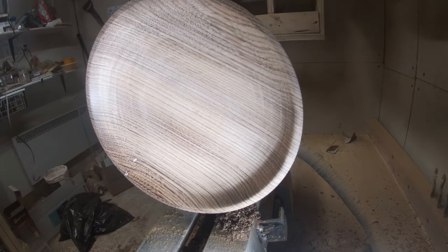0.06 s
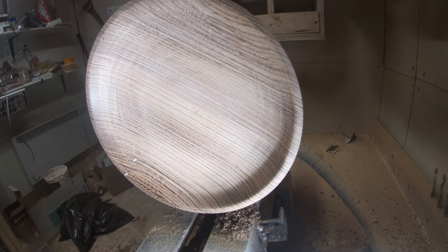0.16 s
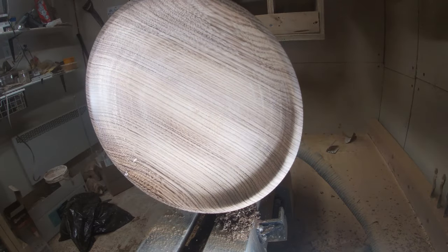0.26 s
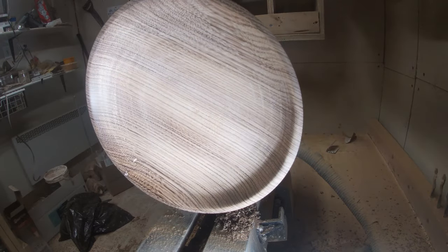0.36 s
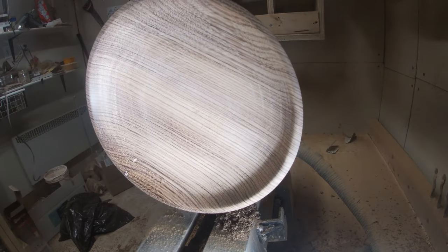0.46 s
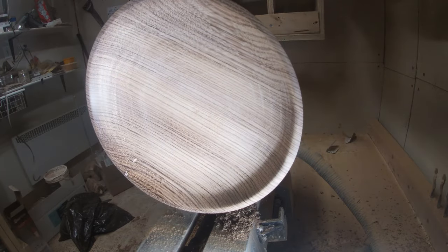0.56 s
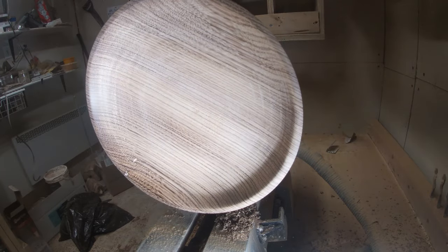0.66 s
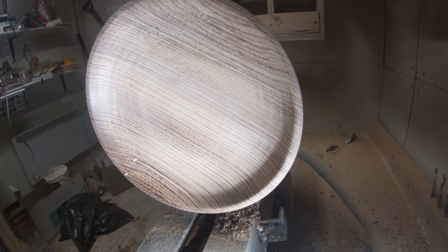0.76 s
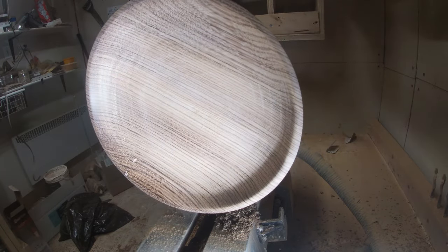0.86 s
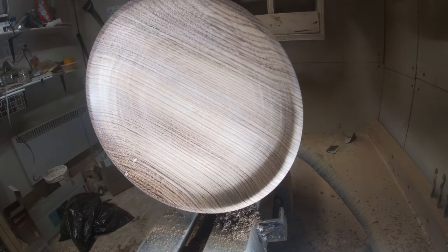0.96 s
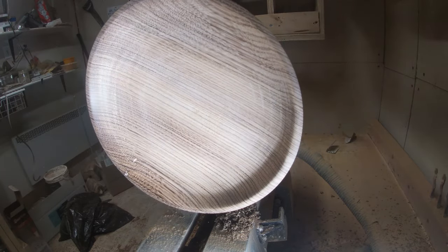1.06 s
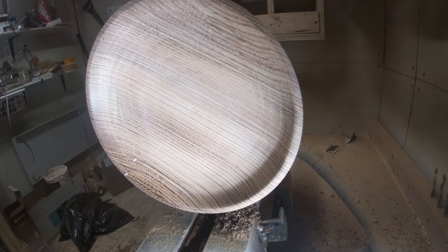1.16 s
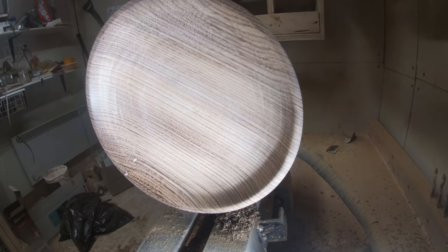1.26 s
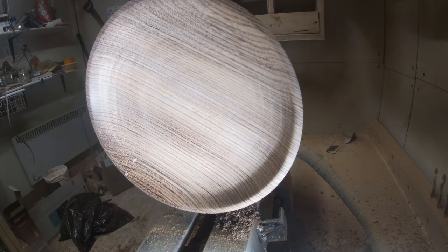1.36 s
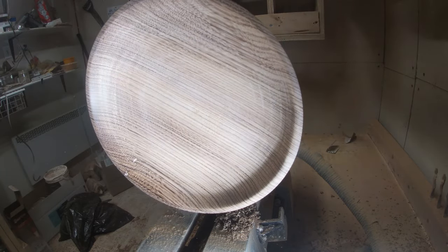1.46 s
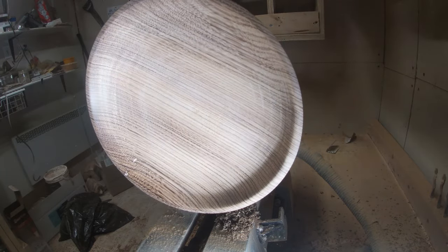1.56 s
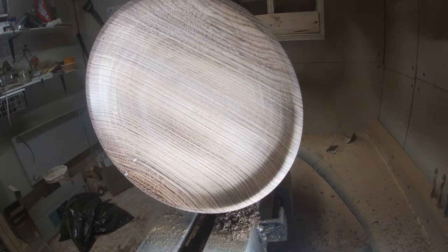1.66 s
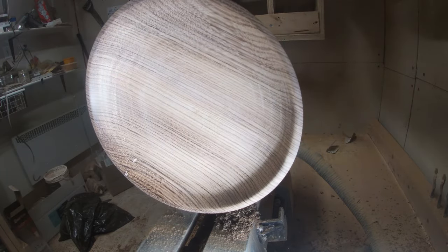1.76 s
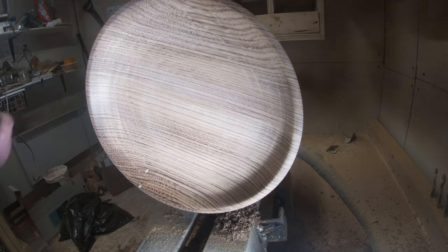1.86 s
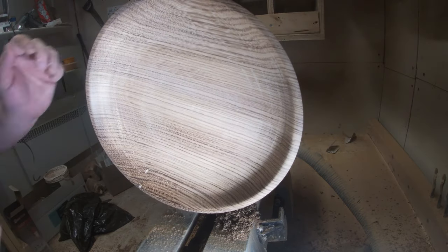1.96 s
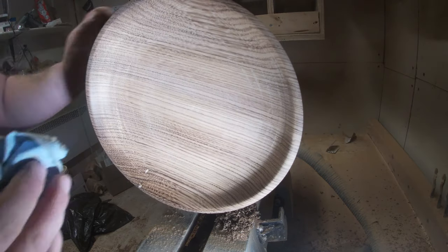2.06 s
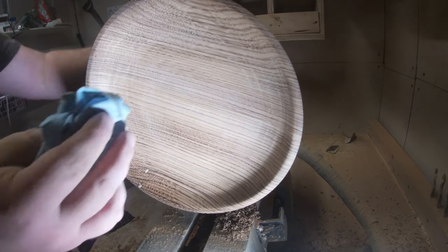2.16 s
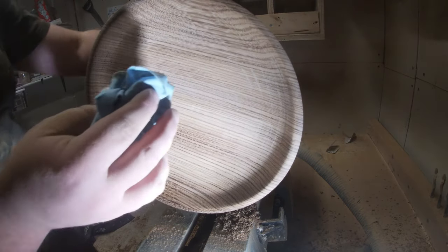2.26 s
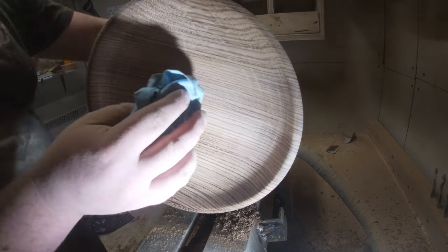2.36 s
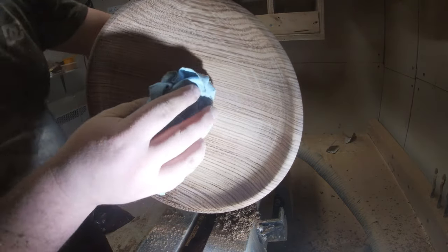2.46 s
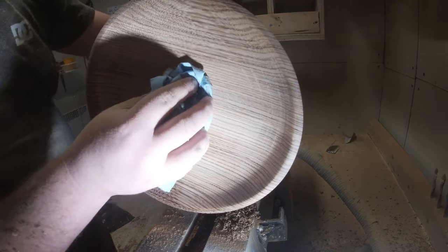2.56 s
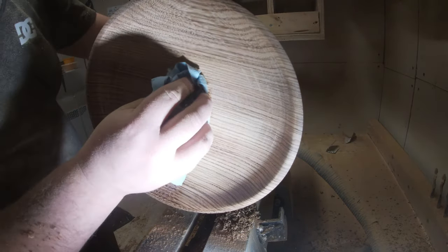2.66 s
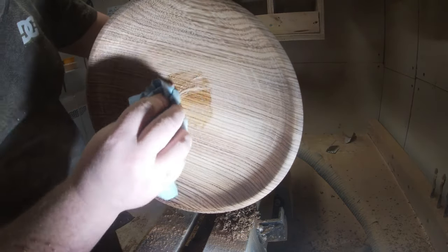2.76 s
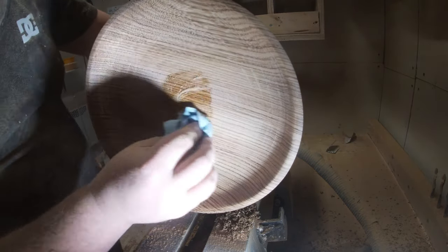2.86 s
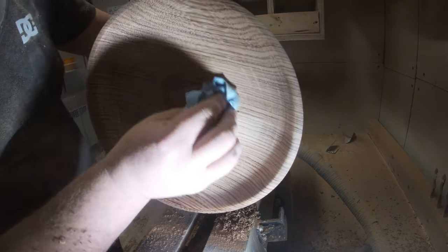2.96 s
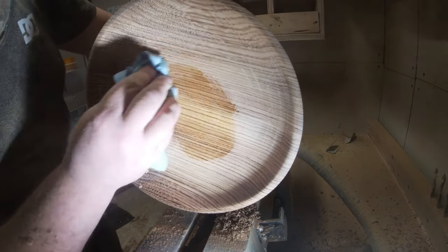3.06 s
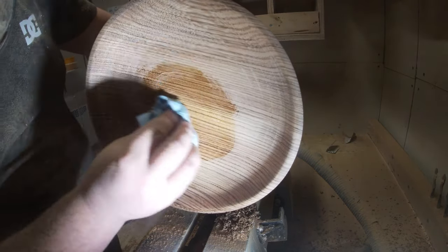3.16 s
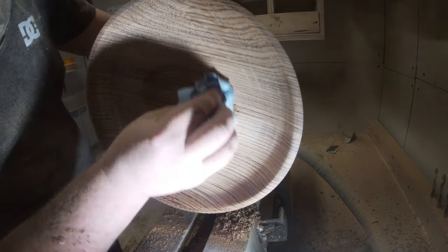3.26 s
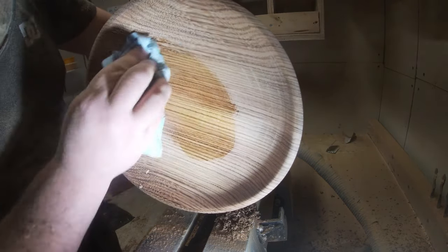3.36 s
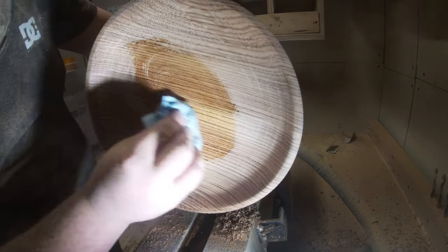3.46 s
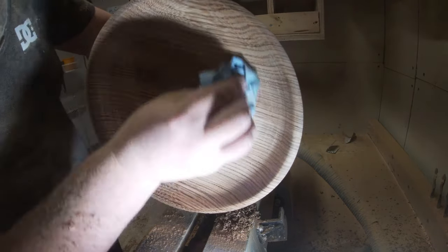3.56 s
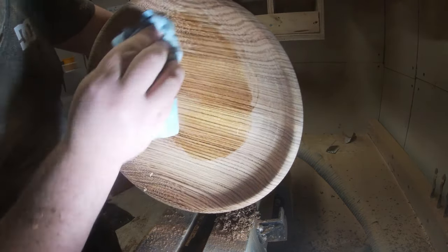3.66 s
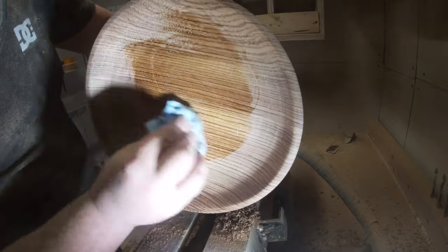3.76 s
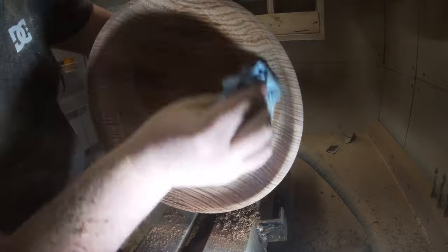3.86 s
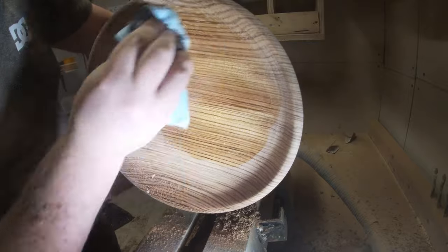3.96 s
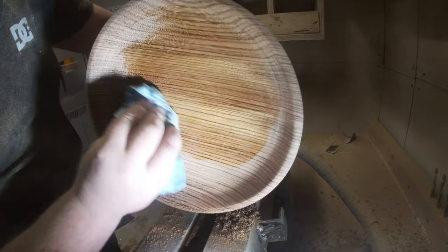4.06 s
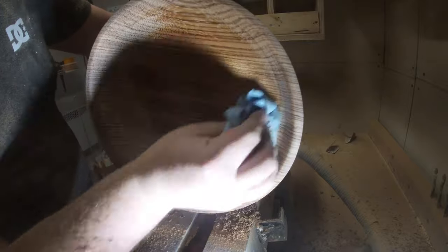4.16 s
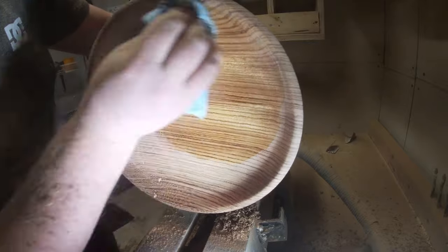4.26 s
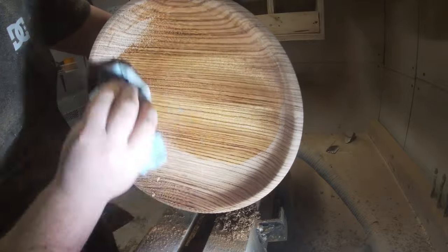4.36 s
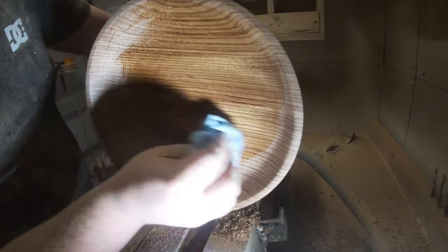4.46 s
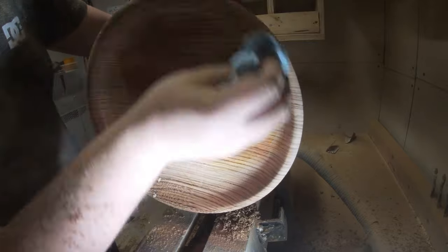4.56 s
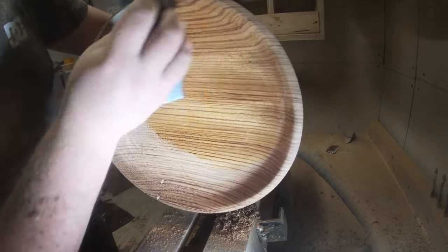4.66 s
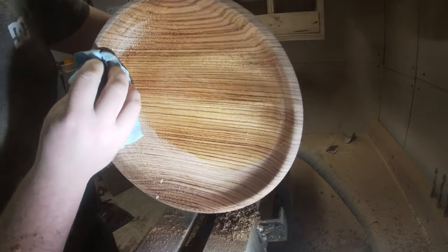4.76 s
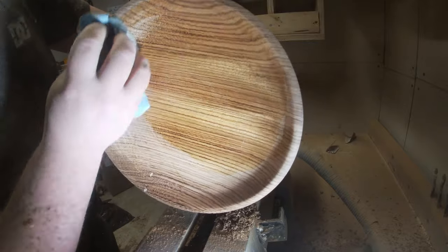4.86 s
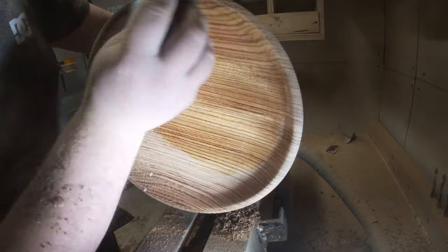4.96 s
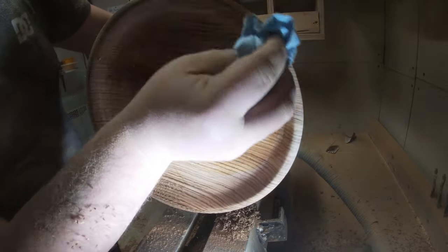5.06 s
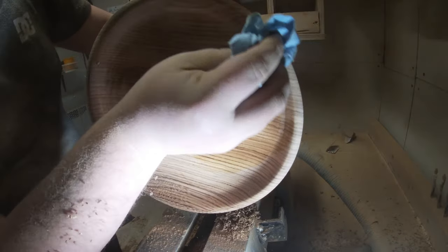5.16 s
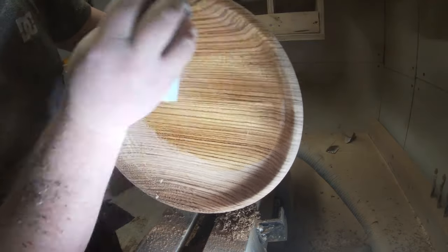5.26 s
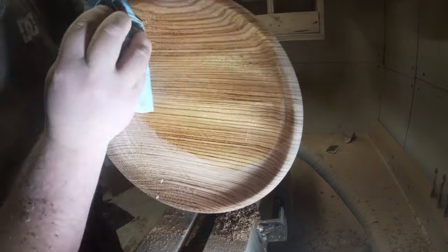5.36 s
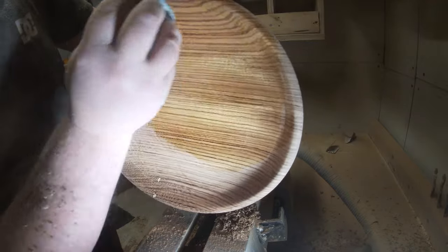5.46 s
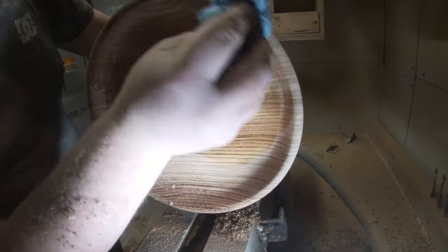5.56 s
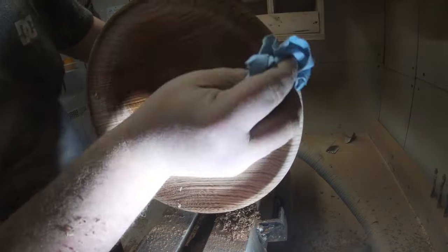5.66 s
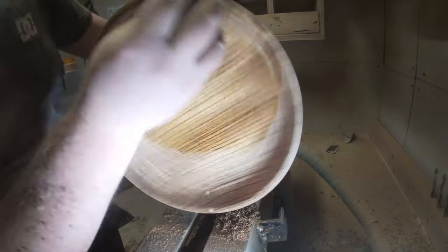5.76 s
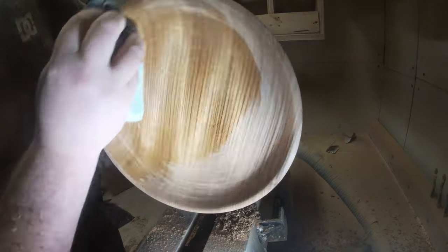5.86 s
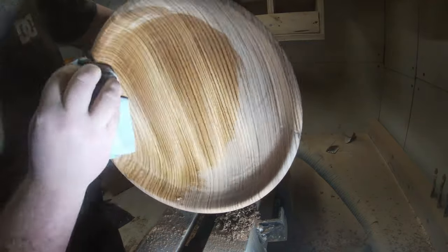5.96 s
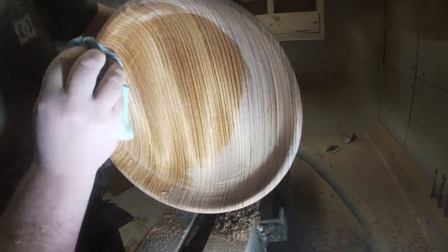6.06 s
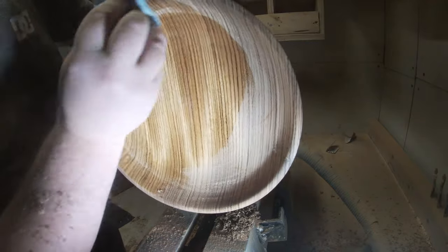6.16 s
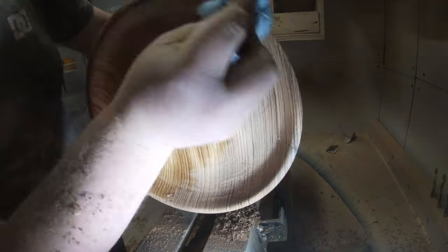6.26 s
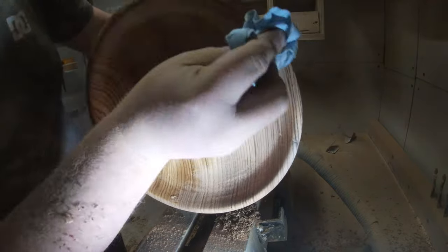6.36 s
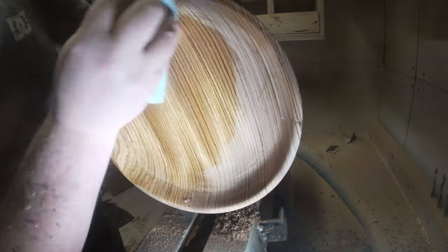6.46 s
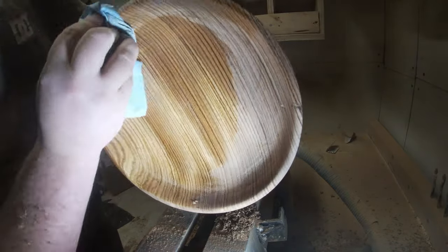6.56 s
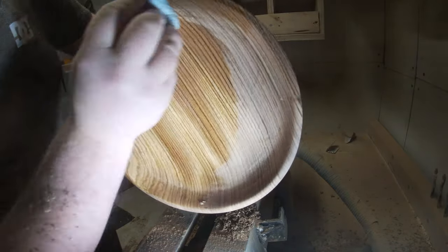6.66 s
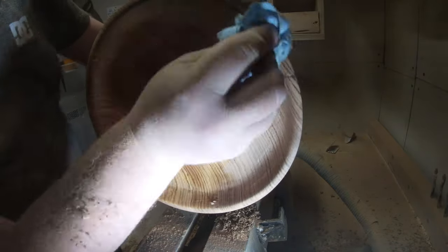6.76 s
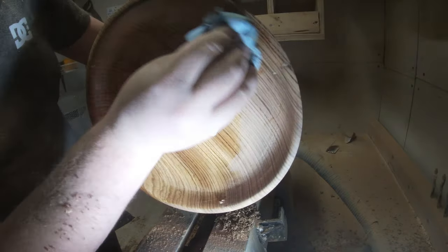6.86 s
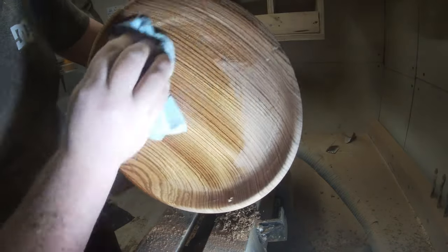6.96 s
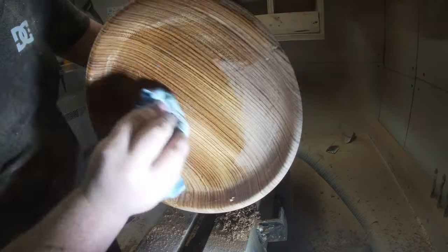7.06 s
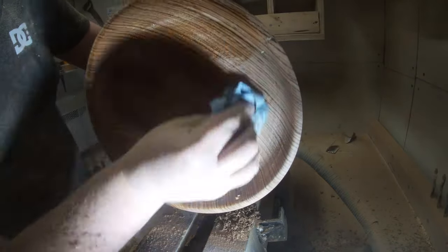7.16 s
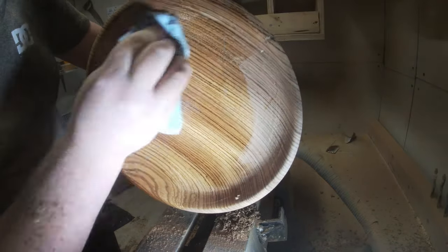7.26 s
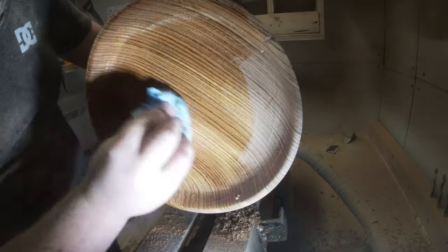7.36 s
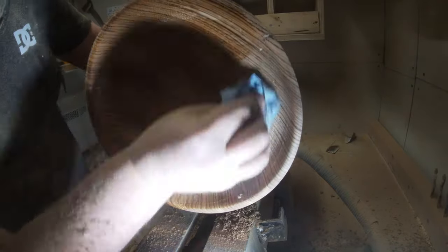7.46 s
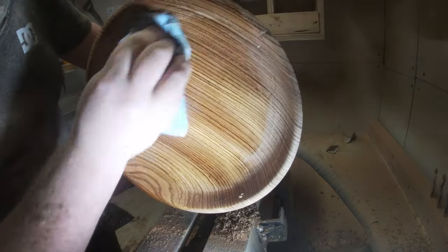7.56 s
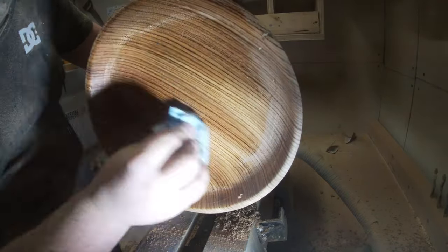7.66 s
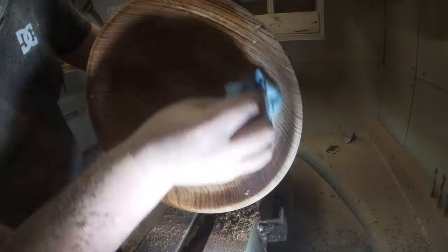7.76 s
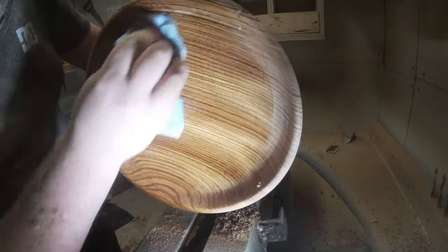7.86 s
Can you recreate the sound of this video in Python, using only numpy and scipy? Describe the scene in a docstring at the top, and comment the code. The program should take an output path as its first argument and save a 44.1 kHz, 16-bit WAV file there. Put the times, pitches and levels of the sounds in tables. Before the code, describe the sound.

Faint scuffs and an insect's rasp in a quiet workshop, a sharp wooden knock with quick bounces, then a cloth rubbing a wooden platter in strokes.

```python
"""A quiet workshop: an insect rasps outside for the first 2.8 s, as gated noise through resonances.
Something is scuffed and slid near a wooden platter on a lathe: stick-slip clicks excite its modes.
It is then dropped with a bouncing knock: impulses set decaying modes ringing, with a noisy clatter.
From 2.5 s a cloth wipes the platter in strokes, and the lathe stand rocks as a very low tone.
Low bumps, room tone of coloured noise and microphone hiss lie underneath; the extreme top is cut."""
import sys
import numpy as np
from scipy import signal
from scipy.fft import rfft, irfft
from scipy.io import wavfile

SR = 44100
rng = np.random.default_rng(int(sys.argv[2]) if len(sys.argv) > 2 else 0)


def waveform_to_disk(signal):
    """Save audio, clipped to [-1, 1], as 16-bit WAV at the path in sys.argv[1]."""
    frames = np.transpose(np.atleast_2d(signal))
    scaled = np.clip(frames, -1, 1) * 32767
    samples = np.round(scaled).astype(np.int16)
    wavfile.write(sys.argv[1], SR, samples)


N = 349713
TIME = np.arange(N) / SR

# resonances of the wiped platter, in groups: body, low wood, ring, swish, sheen
# [f/Hz, width of each filter pass/Hz, relative level on face/dB, relative level on rim/dB]
PLATTER_MODES = [
    [(1232, 180, -9, -2.5), (1390, 122, 5, 5), (1526, 262, 5, -4.5)],
    [(510.5, 530, -8.5, 1.5), (682, 65, -6, 22), (870, 38, -9, 15), (975, 770, -4, -36)],
    [(1893, 225, 0.5, -5), (2132, 164, 2, -14), (2412, 183, -4, -18)],
    [(2725, 640, -1.5, -3), (3344, 540, 2, 4.5), (3372, 136, -0.5, 2.5), (3848, 130, -0.5, 0),
     (4370, 850, -5, -6.5), (4600, 1600, -7, -33), (5247, 340, -8, -0.5), (5630, 700, -6.5, -12),
     (6250, 680, -8, -16), (6680, 760, -13.5, -15.5)],
    [(7720, 900, 0, -6.5), (8260, 140, 0, -14), (8760, 510, -3, -6), (9820, 1190, -1.5, -8),
     (11040, 780, -34, -6.5), (12300, 1400, -36, -14), (13700, 5200, -22.5, -22)],
]
# balance of those groups [level on face/dB, level on rim/dB, share of the speed]
PLATTER_BALANCE = [(-7, -9, -0.21), (-1.5, -1, -0.0098), (-7, -14.5, -0.0046), (-6.5, -1.5, 0.36),
                   (-18, -20.5, 0.86)]
# share of the body note's level taken by each group [ratio]
BODY_NOTE_SHARES = [0.7, 0.11, -0.23, -0.083, -0.11]
# body note of the platter against its higher ring [t/s, level before the shares/dB]
BODY_NOTE = [(2.5, -6), (2.62, -0.5), (2.69, 4.5), (2.77, 1), (3.0, 0), (3.3, 2.5), (3.6, -1), (4.1, -1.5),
             (4.29, -3.5), (4.46, 2), (4.7, -2.5), (4.9, 2.5), (5.5, 1), (6.2, -0.5), (6.3, 5), (6.45, -11),
             (6.6, -2.5), (6.75, 2), (6.83, -7.5), (7.1, -0.5), (7.43, -2), (7.72, -1.5), (7.82, 6.5),
             (7.93, -4.5)]
# position of the cloth [t/s, place from 0 on the face to 1 on the rim]
CLOTH_PLACE = [(2.49, 0.066), (4.55, 0.022), (4.95, 0.73), (5.5, 0.99), (6.1, 0.84), (6.3, 0.8),
               (6.45, 0.33), (6.65, 0.37), (6.8, 0.11), (7.0, 0.17), (7.93, 0.053)]
# strokes of the cloth, each from rest to rest [start t/s, length/s, attack/s, release/s]
CLOTH_STROKES = [(2.48, 0.34, 0.043, 0.06), (2.785, 2.152, .06, .024), (4.926, 0.35, 0.031, 0.058),
                 (5.281, 0.248, 0.063, .025), (5.533, 0.292, 0.015, 0.046), (5.806, .35, 0.025, .05),
                 (6.12, 0.394, 0.034, 0.041), (6.482, 0.23, 0.036, 0.04), (6.714, 1.24, 0.022, 0.017)]
# the hand [t/s, level before balance/dB, speed as brightness before shares/dB, low wood against level/dB]
HAND_MOTION = [(2.5, -51.5, -18, -22), (2.53, -49.5, -17, -16), (2.6, -48.5, -9, -15.5),
               (2.69, -43.5, -16, -18), (2.77, -52.5, -10, -16), (2.83, -51.5, -7, -29),
               (2.91, -49.5, 4, -29), (3.3, -45.5, 1, -37), (3.57, -47, 4, -30), (3.85, -47, 8, -28),
               (4.15, -44, 4.5, -33), (4.28, -46.5, 8, -34), (4.46, -44, 7, -28), (4.73, -51, 7.5, -36),
               (4.88, -50, 4, -24), (5.0, -51, -4, -24), (5.17, -51.5, -2.5, -23), (5.4, -53, -8, -21),
               (5.56, -50.5, -16, -27), (5.575, -51, -14, -26), (5.67, -50, -6, -22),
               (5.72, -47.5, -3, -32), (5.84, -57, -5, -25), (5.92, -50.5, -9, -25),
               (5.97, -61.5, -27, -20), (6.13, -62, -30, -10), (6.18, -58.5, -25, -21),
               (6.21, -49, -23, -24), (6.29, -49.5, 3.5, -15.5), (6.4, -53.5, 8.5, -26),
               (6.52, -60, 5.5, -26), (6.6, -49.5, 7.5, -30), (6.75, -48, 0.5, -21), (6.83, -49, 8.5, -26),
               (6.96, -51, -2, -14), (7.08, -42.5, 4.5, -23), (7.18, -41.5, -1, -25), (7.21, -45, 4, -20),
               (7.31, -48, 3.5, -15.5), (7.43, -44, 5, -25.5), (7.6, -46.5, 6.5, -20.5),
               (7.76, -44.5, 6, -24.5), (7.93, -49, 11, -29)]
# the cloth is slow, so dull, at both ends of a stroke
SPEED_UP_S, SLOW_DOWN_S, AT_REST_DB = 0.043, 0.058, -18
CREEP_DB = -17  # the cloth never quite stops between strokes


def cloth():
    """Sliding friction: speed brightens the sound of each stroke, and the rim damps the ring."""
    level_db, speed_db, wood_db = in_time(HAND_MOTION)
    place = np.clip(in_time(CLOTH_PLACE)[0], 0, 1)
    body_db, = in_time(BODY_NOTE)
    contact = sum(ramp(*stroke) ** 2 for stroke in CLOTH_STROKES)
    contact = contact + from_db(CREEP_DB) * (TIME > CLOTH_STROKES[0][0])
    moving = sum(ramp(start, length, SPEED_UP_S, SLOW_DOWN_S) for start, length, *_ in CLOTH_STROKES)
    speed_db = speed_db + AT_REST_DB * (1 - np.minimum(moving, 1))
    gains = []
    for (face_db, rim_db, speed_share), body_share in zip(PLATTER_BALANCE, BODY_NOTE_SHARES):
        place_db = face_db + place * (rim_db - face_db)
        group_db = level_db + place_db + speed_share * speed_db + body_share * body_db
        gains.append(contact * from_db(group_db))
    gains[1] = gains[1] * from_db(wood_db)  # the low wood follows its own column
    return rubbing(gains, PLATTER_MODES, place, per_s=9000., spread_db=1.0, judder_db=0.37, judder_hz=80.6)


# resonances of the slid object, in the platter's order of groups
# [f/Hz, width of each filter pass/Hz, relative level/dB]
SLID_MODES = [
    [(1290, 1200, -12.5), (1505, 320, -3)],
    [(520, 210, -4.5), (870, 2200, -2), (1000, 110, -1)],
    [(1760, 110, 6), (2090, 134, 13.3), (2500, 140, 1.7)],
    [(2790, 350, 1), (3250, 790, -0.5), (3780, 67, -3), (4670, 790, -7), (5480, 570, -7.5),
     (6300, 800, -10.5)],
    [(7530, 440, -4), (8240, 960, -6), (9500, 1600, -10.5), (12600, 3200, -33)],
]
# balance of those groups [level/dB, share of the body tilt, share of the brightness]
SLID_BALANCE = [(-6.5, 0.81, 0.035), (-15.5, 1, 0), (-6.5, -0.46, 0.3), (-11, -0.017, 0.81),
                (-27, -0.13, 0.71)]
# scuffs, levels before balance [start t/s, length/s, attack/s, release/s, level at start/dB, level at end/dB,
# body against ring/dB, brightness/dB]; the last two before shares
SCUFF_EVENTS = [(0.0, 0.058, 0.026, .03, -58, -63, -1, 1), (0.426, .14, 0.037, 0.079, -57.5, -53, -12, -7),
                (0.56, 0.22, .03, 0.055, -66, -64, -9, -7),
                (1.036, .1, 0.012, 0.052, -45.5, -44.5, -8.5, 0.5),
                (1.136, 0.066, .012, 0.018, -42.5, -45, -8.5, -0.5),
                (1.19, 0.1, 0.0067, 0.024, -46.5, -48.5, -10.5, -0.5),
                (1.247, .21, 0.035, 0.089, -53, -40.5, -2.5, 2),
                (2.054, 0.21, 0.023, 0.078, -58, -60.5, 4, 6.5), (2.224, 0.13, 0.023, .07, -67, -64, 2, 3)]
# faint shuffling under the scuffs, before balance and shares
# [t/s, level/dB, body against ring/dB, brightness/dB]
SHUFFLING = [(0, -62.5, 5, 2.5), (.21, -62, 2, -3), (.28, -71.5, 12, -8), (.45, -66, -2, 8),
             (.78, -63, 7, -1.5), (1.02, -59.5, -2, -7), (1.14, -65.5, 5, 3), (1.45, -67, 4, 11),
             (1.5, -95, -2, -5), (1.76, -74, -8, -3), (1.8, -66, -2, 6), (1.92, -70.5, 11.5, -4),
             (2.06, -70.5, 12, -6), (2.35, -67, 3.5, 1), (2.46, -62.5, 2.5, 0), (2.52, -88, 0, 5)]
# shuffling against the scuffs, by group [level/dB]
SHUFFLING_BALANCE_DB = [-0.5, 5, 0.5, 0.5, 2.5]


def slid_object():
    """Stick-slip excitation: scuffs of differing strength and colour over a faint shuffling."""
    base_db, tilt_shares, bright_shares = np.transpose(SLID_BALANCE)[:, :, None]

    def colour_db(tilt_db, bright_db):
        """Spectral balance: level of each group for a tilt and a brightness."""
        return base_db + tilt_shares * tilt_db + bright_shares * bright_db

    level_db, tilt_db, bright_db = in_time(SHUFFLING)
    gains = from_db(level_db + np.c_[SHUFFLING_BALANCE_DB] + colour_db(tilt_db, bright_db))
    for start, length, rise_s, fall_s, start_db, end_db, tilt_db, bright_db in SCUFF_EVENTS:
        level = from_db(np.interp(TIME, [start, start + length], [start_db, end_db]))
        level = level * ramp(start, length, rise_s, fall_s) ** 2
        gains = gains + from_db(colour_db(tilt_db, bright_db)) * level
    return rubbing(gains, SLID_MODES, 0, per_s=5500.0, spread_db=3.0, judder_db=1.0, judder_hz=40.0)


# blows [t/s, level at 2 kHz/dB, brightness/dB per octave]
BLOWS = [(1.3535, -36, -6.5), (1.8115, -44, -2), (1.822, -31, -1), (1.8327, -4.5, 0), (1.8625, -12, -2),
         (1.8955, -14.5, -3)]
# ringing modes [f/Hz, relative level/dB, t60/s]
RINGING_MODES = [(524, -32, 0.17), (1480, -32.5, 0.3), (1775, -13, .085), (1990, -2.5, .019),
                 (2100, -13, .08), (2220, -35.5, 0.079), (2500, -10.5, 0.0087), (2720, -23, 0.024),
                 (3160, -29.5, 0.023), (3800, -32, 0.018), (4610, -22, 0.017), (6300, -29, 0.019)]
# dense tail of a blow [f/Hz, width of each filter pass/Hz, relative level/dB, t60/s]
CLATTER_BANDS = [(253, 310, -41, 0.033), (547, 41, -43.5, .1), (950, 330, -67, 0.062),
                 (1950, 460, -28, 0.32), (3400, 1700, -28.5, 0.12), (4750, 970, -30, 0.074),
                 (6250, 1500, -49, 0.04), (8800, 2000, -51, .04)]
# the bench answers the first bounce [f/Hz, level/dB, t60/s]
BENCH_THUD = (114.5, -40, 0.56)
# the next bounce stills the bench, in a fade that ends at THUD_HUSHED_S
THUD_S, THUD_HUSHED_S, THUD_HUSH_S = 1.862, 1.897, .012
KNOCK_STOPS_S = 1.9028


def knocks():
    """Impact and modal decay: a tap, then two ticks, a drop and two bounces; the ringing breaks off short."""
    out = np.zeros(N)
    blow_s, blow_db, tilt_db = np.transpose(BLOWS)
    chance_db = rng.normal(0, 1, (len(BLOWS), len(RINGING_MODES)))

    def blows(hz, level_db):
        """Impulsive excitation: the blows as felt at one pitch."""
        clicks = np.zeros(N)
        octaves = np.log2(hz / 2000)
        clicks[np.round(blow_s * SR).astype(int)] = from_db(blow_db + level_db + tilt_db * octaves)
        return clicks + 1e-18

    for k, (hz, level_db, t60) in enumerate(RINGING_MODES):
        # the mode takes up the blow over a cycle or two, so no bare click is heard
        softened = resonance(blows(hz, level_db + chance_db[:, k]), hz, hz)
        out += ring(softened, hz, t60)
    for hz, width, level_db, t60 in CLATTER_BANDS:
        decay = from_db(-60 / (t60 * SR))
        fading = signal.lfilter([1], [1, -decay], blows(hz, level_db))
        fading = signal.lfilter([.04], [1, -.96], fading)  # softens the onset
        out += fading * rms_one(resonance(rng.standard_normal(N), hz, width))
    hz, level_db, t60 = BENCH_THUD
    since = np.maximum(TIME - THUD_S, 0)
    envelope = from_db(level_db - 60 * since / t60) * np.minimum(since / .012, 1)
    hush = np.clip((THUD_HUSHED_S - TIME) / THUD_HUSH_S, 0, 1)
    out += envelope * hush * np.sin(2 * np.pi * hz * since)
    out = signal.sosfilt(signal.butter(6, 10000, fs=SR, output="sos"), out)
    return out * (TIME < KNOCK_STOPS_S)


# pushes that rock the stand [t/s, hold/s, level/dB, rise/dB per s, fall/dB per s]
ROCKING_PUSHES = [(2.81, .01, -58.5, 200, 78), (3.64, 0.0092, -67, 170, 240), (3.92, .01, -68, 165, 600),
                  (4.1, .01, -61, 200, 230), (4.25, 0.0092, -56.5, 200, 26), (5.14, 0.0091, -55.5, 90, 193),
                  (5.75, 0.014, -53, 69, 114), (6.06, 0.0073, -51.5, 90, 318), (6.27, 0.2, -44, 210, 225),
                  (6.67, 0.0046, -49, 74, 300), (6.93, .01, -54, 218, 450), (7.08, 0.0068, -50.5, 340, 113),
                  (7.37, 0.0064, -46, 131, 140), (7.44, .34, -56, 137, 300)]
# pitch of the rocking [t/s, f/Hz]
ROCKING_PITCH = [(2.6, 23.5), (3.35, 25.3), (3.5, 22), (4.1, 22.1), (4.18, 25.22), (7.93, 24.37)]
# hands and body bumping the machine [t/s, hold/s, level/dB, rise/dB per s, fall/dB per s]
MACHINE_BUMPS = [(.79, 0.009, -73, 60, 180), (1.37, .01, -68, 180, 190), (1.84, 0.027, -56, 459, 397),
                 (2.1, 0.087, -63, 230, 200), (2.74, 0.0091, -65.5, 58, 92), (4.46, .01, -71.5, 29, 251.5),
                 (4.75, 0.011, -64, 93, 102), (5.21, .01, -67.5, 206, 29), (5.59, .01, -65, 180, 36),
                 (5.99, 0.012, -67.5, 130, 39), (6.36, 0.011, -67, 25, 160), (6.78, .01, -66, 80, 25),
                 (7.55, .01, -69.5, 40, 500), (7.66, 0.25, -73, 120, 100)]
# resonances of the rumble [f/Hz, width of each filter pass/Hz, relative level/dB]
RUMBLE_RESONANCES = [(107, 13, -3), (137, 29, -2), (170.3, 148, 2), (215, 10, 9), (257.5, 49, -5)]
RUMBLE_DB = -77  # between the bumps


def stand():
    """Low-frequency oscillation: the lathe stand rocks as a nearly pure tone, over a lumpy rumble."""
    cycles = np.cumsum(in_time(ROCKING_PITCH)[0]) / SR
    rocking_level = np.sqrt(2) * from_db(swells(ROCKING_PUSHES, rest_db=-100))
    rocking = rocking_level * np.sin(2 * np.pi * cycles)
    rumble = resonate(rng.standard_normal(N), RUMBLE_RESONANCES, wander_db=2.0)
    return rocking + from_db(swells(MACHINE_BUMPS, RUMBLE_DB)) * rumble


# loudness of the insect [t/s, level before a fixed lift of 7 dB/dB]
INSECT_LEVEL = [(0, -79), (.35, -79.5), (.5, -84), (.7, -77), (1.0, -80), (1.5, -79.5), (2.0, -78.5),
                (2.5, -77.5), (2.8, -120)]
# resonances of the insect [f/Hz, width of each filter pass/Hz, relative level/dB]
INSECT_RESONANCES = [(5840, 960, -8.5), (6000, 530, -8.5), (6700, 570, -8.5), (9960, 900, -20.5)]
# rate of the rasps, in steps [from t/s, rasps per s]
RASP_RATES = [(0, 29.95), (.2, 28.43), (.5, 30.85), (1.3, 29.1), (1.6, 30.2), (1.7, 34.5), (1.8, 31.52),
              (2.3, 29.23)]
RASP_PHASE = -.49  # cycles


def insect():
    """Amplitude modulation: about thirty uneven rasps a second, each just over a third of its cycle."""
    from_s, per_s = np.transpose(RASP_RATES)
    rate = per_s[np.searchsorted(from_s, TIME, "right") - 1]
    count = RASP_PHASE + np.cumsum(rate) / SR
    burst = np.clip(2.6 * (np.cos(2 * np.pi * count) - .4), 0, 1)
    strengths = from_db(rng.normal(0, 1.1, 400))
    strength = strengths[np.round(count).astype(int) % 400]
    level = from_db(in_time(INSECT_LEVEL)[0] + 7.0)
    return level * burst * strength * resonate(rng.standard_normal(N), INSECT_RESONANCES)


# colour of the room tone [f/Hz, relative spectral level/dB]
AIR_COLOUR = [(12, -31.5), (20, 3), (86, -8.5), (210, -9.5), (527, -14), (769, -1.5), (1060, -11),
              (1600, -0.5), (2270, -9.5), (3500, -16), (5690, -12.5), (6690, -14), (8080, -21.5),
              (10000, -25), (12800, -40.5), (16600, -61), (22000, -120)]
# the treble of the room tone dims and returns [t/s, level/dB]
TREBLE_LEVEL = [(0, -4), (4.6, 4.5), (4.9, -16), (6.0, -22), (6.7, -1), (7.0, -5)]
AIR_DB = -70  # whole room tone, before the treble changes


def room_tone():
    """Spectral shaping: coloured noise, steady below and changing in level above about 5800 Hz."""
    hz = np.maximum(np.fft.rfftfreq(N, 1 / SR), 10)
    colour_hz, colour_db = np.transpose(AIR_COLOUR)
    colour = from_db(np.interp(np.log(hz), np.log(colour_hz), colour_db))
    air = from_db(AIR_DB) * rms_one(irfft(rfft(rng.standard_normal(N)) * colour, N))
    treble = signal.sosfiltfilt(signal.butter(6, 5800, "high", fs=SR, output="sos"), air)
    return air + treble * (from_db(in_time(TREBLE_LEVEL)[0]) - 1)


def rubbing(gains, groups, place, per_s, spread_db, judder_db, judder_hz):
    """Stick-slip friction: dense uneven clicks ring the body's groups of modes; pressure judders."""
    sizes = from_db(spread_db * np.minimum(rng.exponential(1, N), 5)) * rng.choice([-1, 1], N)
    slips = sizes * (rng.random(N) < per_s / SR)
    voices = [resonate(slips, modes, place, wander_db=1.76) for modes in groups]
    out = sum(gain * voice for gain, voice in zip(gains, voices))
    return out * from_db(judder_db * drift(judder_hz))


def resonate(x, modes, place=0, wander_db=0):
    """Modal superposition: parallel resonances at places from face to rim, scaled by their summed power."""
    out, power = 0, 0
    for k, (hz, width, *levels_db) in enumerate(modes):
        gain = from_db(levels_db[0] + place * (levels_db[-1] - levels_db[0]))
        # another stretch of the excitation for each mode, so that they add without cancelling
        rung = resonance(np.roll(x, 23011 * k), hz, width)
        out = out + gain * from_db(wander_db * drift(8.1)) * rung  # each level wanders on its own
        power = power + gain ** 2 * np.mean(rung ** 2)
    return out / np.sqrt(power)


def resonance(x, hz, width):
    """Cascaded resonance: one band passed twice, so that its skirts fall steeply."""
    r = np.exp(-np.pi * width / SR)
    row = [(1 - r * r) / 2, 0, (r * r - 1) / 2, 1, -2 * r * np.cos(2 * np.pi * hz / SR), r * r]
    return signal.sosfilt([row, row], x)


def ring(clicks, hz, t60):
    """Damped free vibration: a unit click sets a decaying sine ringing."""
    r, w = from_db(-60 / (t60 * SR)), 2 * np.pi * hz / SR
    return signal.lfilter([0, np.sin(w)], [1, -2 * r * np.cos(w), r * r], clicks + 1e-18)


def swells(rows, rest_db):
    """Envelope in dB: each row rises, holds and falls; the loudest wins."""
    out = np.full(N, float(rest_db))
    for start, hold, db, rise, fall in rows:
        before = np.maximum(start - TIME, 0)
        after = np.maximum(TIME - start - hold, 0)
        out = np.maximum(out, db - rise * before - fall * after)
    return out


def ramp(start, length, rise_s, fall_s):
    """Linear envelope: zero outside a stroke, rising to at most one and falling at its ends."""
    return np.clip((TIME - start) / rise_s, 0, 1) * np.clip((start + length - TIME) / fall_s, 0, 1)


def drift(rate):
    """Low-passed random fluctuation, scaled to unit power; rate in Hz."""
    r = np.exp(-2 * np.pi * rate / SR)
    noise = rng.standard_normal(N + SR)
    return rms_one(signal.lfilter([1], [1, -2 * r, r * r], noise)[SR:])  # the first second settles


def in_time(rows):
    """Linear interpolation: columns of a table joined by straight lines."""
    s, *columns = np.transpose(rows)
    return [np.interp(TIME, s, column) for column in columns]


def rms_one(x):
    """Power normalisation: scale to unit mean square."""
    return x / np.sqrt(np.mean(x ** 2) + 1e-20)


def from_db(db):
    """Logarithmic level: decibels to amplitude gain."""
    return 10 ** (np.asarray(db) / 20)


def scene():
    """Linear superposition: all sources, heard from one point."""
    return (slid_object() + cloth() + knocks() + stand() + insect() + room_tone())[None]


# band edges of the microphone hiss [f/Hz]
MIC_HISS_BAND = (4016, 12700)
MIC_HISS_DB = -92.5
STOPBAND_HZ = 15600  # from here up the sound is at least 60 dB down


def record(dry):
    """Additive self-noise and band limiting: the microphone adds its own hiss; the top is cut."""
    band = signal.butter(8, MIC_HISS_BAND, "band", fs=SR, output="sos")
    hiss = from_db(MIC_HISS_DB) * rms_one(signal.sosfilt(band, rng.standard_normal(N)))
    return signal.sosfilt(signal.cheby2(12, 60, STOPBAND_HZ, fs=SR, output="sos"), dry + hiss)


dry = scene()
out = record(dry)
waveform_to_disk(out)
```